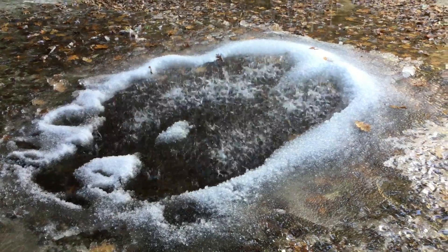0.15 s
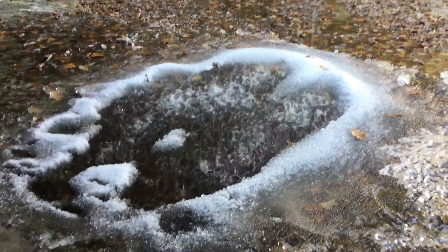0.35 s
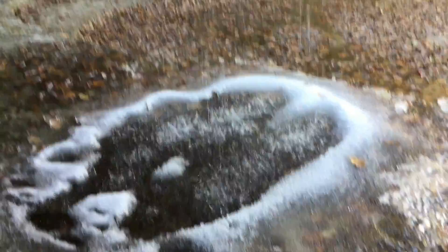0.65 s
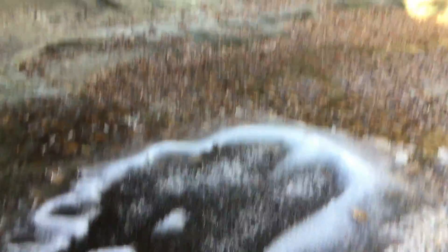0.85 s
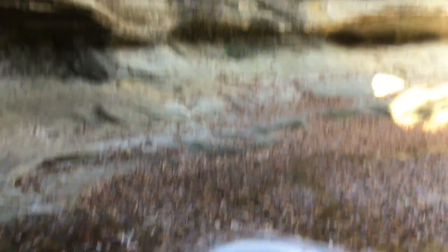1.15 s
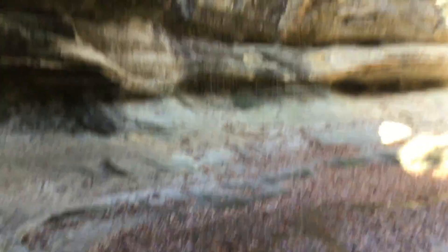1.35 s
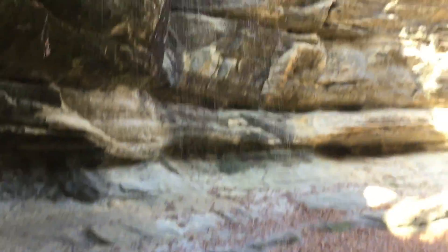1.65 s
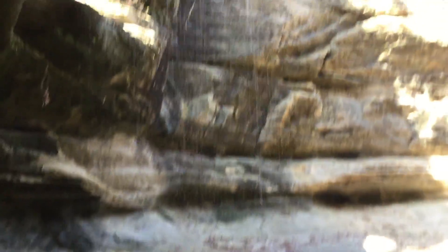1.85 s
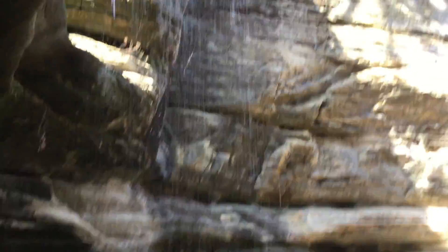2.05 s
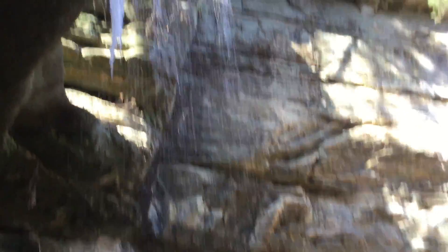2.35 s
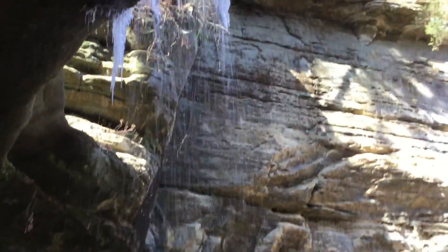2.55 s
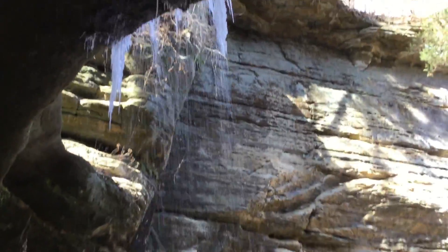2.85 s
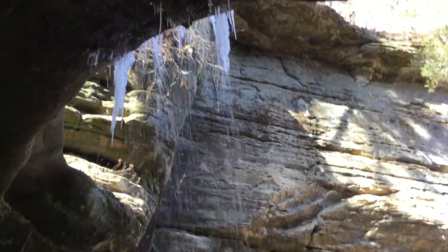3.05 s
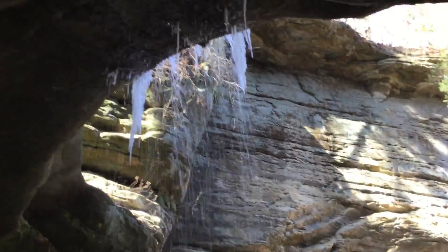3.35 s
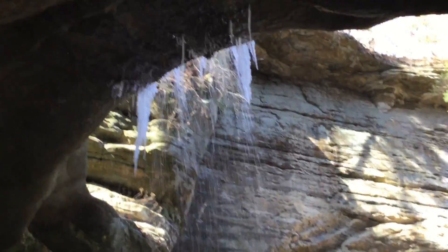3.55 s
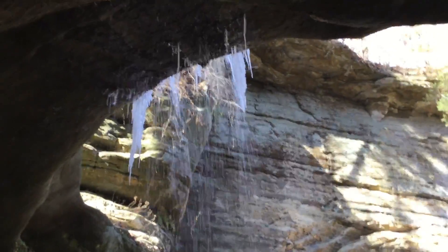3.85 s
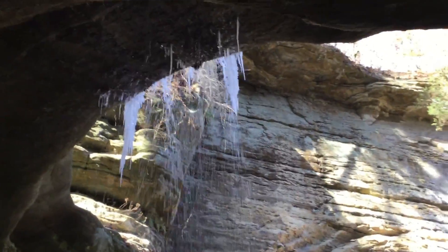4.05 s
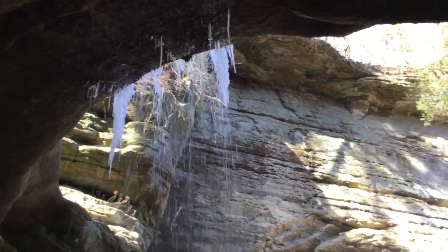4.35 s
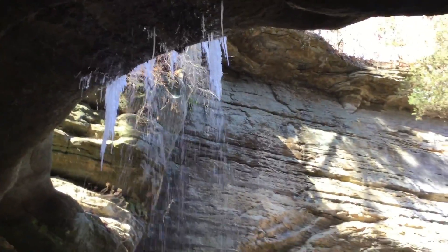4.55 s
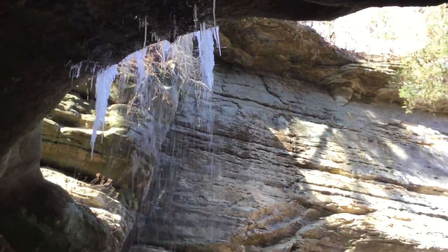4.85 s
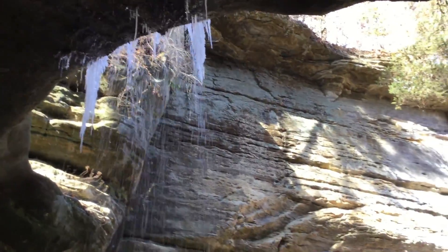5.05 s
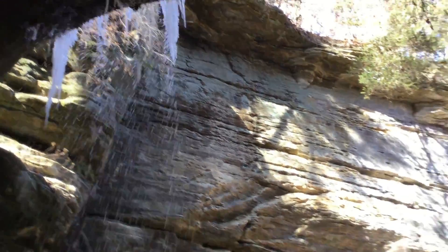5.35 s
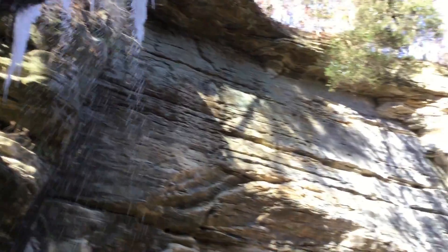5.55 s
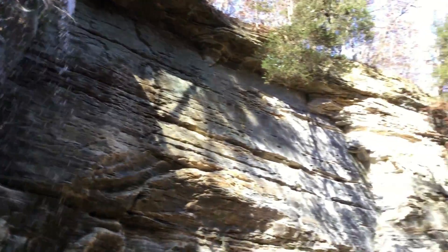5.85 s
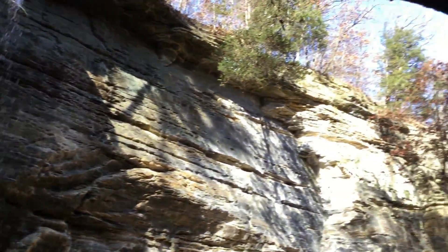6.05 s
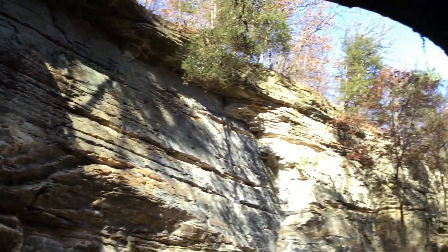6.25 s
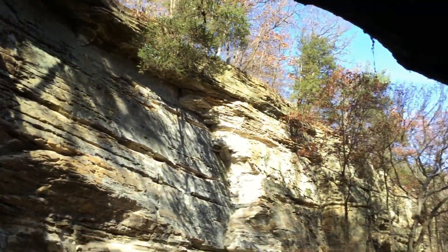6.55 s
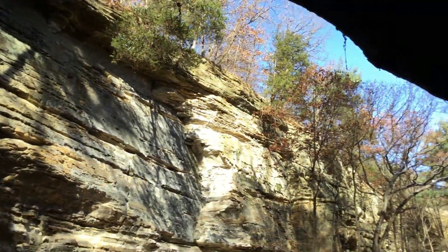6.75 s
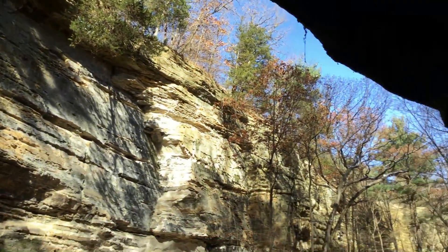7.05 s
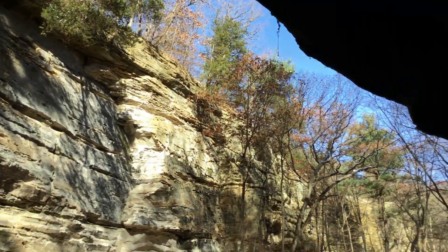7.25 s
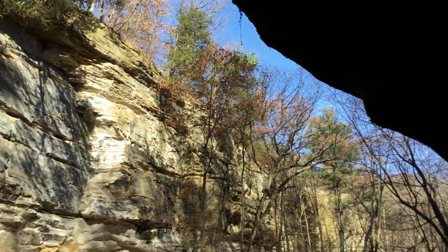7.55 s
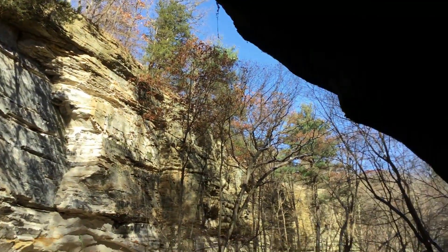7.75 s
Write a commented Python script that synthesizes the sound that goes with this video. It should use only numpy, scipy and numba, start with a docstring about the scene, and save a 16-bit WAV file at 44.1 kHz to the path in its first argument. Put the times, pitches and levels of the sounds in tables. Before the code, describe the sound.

Outdoors under a stone roof, a handheld phone picks up constant dripping and splattering water. Countless fine drops merge into a crisp, fizzing patter, with louder individual drips clicking and ringing irregularly on top, thickest in the first second. Early on the colour shifts as the phone swings upward. Midway a small air bubble gives a quick upward bloop, then the splashing carries on to the end, with little bass.

```python
"""Thin streams of melt water fall from a rock overhang into a shallow pool, a few metres from a phone.
From the start, noise-burst slaps and thousands of damped, ringing bubbles merge into a splashing hiss
with single drops standing out. At about one second the phone tilts up and the balance of the rock
echoes changes; at five seconds an air pocket closes with a rising sine, a bloop. Four scattered
echoes return each drop, and a decaying noise tail adds a short wash throughout."""
import sys
import numpy as np
from scipy import signal
from scipy.fft import rfft, irfft, next_fast_len
from scipy.io import wavfile
from scipy.ndimage import uniform_filter1d
from numba import njit

SR = 44100
rng = np.random.default_rng(int(sys.argv[2]) if len(sys.argv) > 2 else 0)


def master_out(mix):
    """Clip the mix to full scale and print it as 16-bit PCM to the path in sys.argv[1]."""
    frames = np.transpose(np.atleast_2d(mix))
    ceiling = np.clip(frames, -1, 1)
    pcm = np.round(ceiling * 32767).astype(np.int16)
    wavfile.write(sys.argv[1], SR, pcm)


N = 348163

# Echoes off the rock roof and wall. Each row: delay in seconds, level in dB while the phone looks
# down at the pool, level in dB once it looks up at the roof; both levels before random scatter.
ECHOES = [(.0066, -15, -3.5), (.0117, -10, -9.5), (0.0193, -3, -14), (.0257, -43, -14)]
TILT_START_S, TILT_END_S = 0.81, 1.23  # the phone tilts up
ROCK_SCATTER_S = .0004  # drops land at different spots: largest shift of an echo either way
ROCK_SMEAR = 1.3  # rough stone draws the later echoes out by this factor
SMALL_FACE_HZ = 1490  # below this all faces but the broad far wall return less and less
SLAP_S = 0.00053  # time constant of an impact's fading amplitude
PINCH_S = 0.0003  # time a bubble takes to close, besides half its cycle


def undb(db):
    """Amplitude gain: a level in dB is twenty times its decimal logarithm."""
    return 10 ** (np.asarray(db) / 20)


def unit(x):
    """Normalises the mean power: scales to rms 1."""
    return x / np.sqrt(np.mean(x ** 2))


def curve(table, column):
    """Linear interpolation: one column of a table, sample by sample."""
    rows = np.array(table)
    return np.interp(np.arange(N) / SR, rows[:, 0], rows[:, column])


def walk(rate):
    """Low-passed noise: random levels held 1 / rate s and smoothed twice; spread near a half."""
    hold = int(SR / rate)
    steps = np.repeat(rng.standard_normal(N // hold + 1), hold)
    return 0.63 * uniform_filter1d(uniform_filter1d(steps, hold), hold)[:N]


def colour(x, points):
    """Spectral shaping: replaces a sound's smooth spectrum by the (Hz, dB) points, at rms 1."""
    n = next_fast_len(N)
    spectrum = rfft(x, n)
    hz = np.maximum(np.arange(n // 2 + 1) * SR / n, 1)
    centres = 25 * 2 ** (np.arange(31) / 3)  # third octaves
    centres = centres[centres < SR / 2]
    power = [np.mean(np.abs(spectrum[(hz > c * .8) & (hz < c * 1.25)]) ** 2) for c in centres]
    own_db = np.interp(np.log(hz), np.log(centres), 10 * np.log10(power))
    points = np.array(points)
    want_db = np.interp(np.log(hz), np.log(points[:, 0]), points[:, 1])
    return unit(irfft(spectrum * undb(want_db - own_db), n)[:N])


def paths(s, db):
    """Multipath: start samples and levels of each drop, directly, then off the rock roof and wall."""
    chance = rng.random((len(s), 2 * len(ECHOES))) - .5
    times, levels = [s], [db]
    for k, (delay_s, *tilt_db) in enumerate(ECHOES):
        times.append(s + delay_s + 2 * ROCK_SCATTER_S * chance[:, 2 * k])
        echo_db = np.interp(s, [TILT_START_S, TILT_END_S], tilt_db)
        levels.append(db + echo_db + 6 * chance[:, 2 * k + 1])
    return (np.concatenate(times) * SR).astype(np.int64), np.concatenate(levels)


def shower(count, spread_db, surge_db):
    """A random point process, few drops large and many small: time, level and two more chances each."""
    chance = rng.random((count, 4))
    s = chance[:, 0] * N / SR
    db = -spread_db * np.log(1 - .97 * chance[:, 1]) + surge_db[(s * SR).astype(int)]
    return s, db, chance[:, 2], chance[:, 3]


def slaps(s, db):
    """Impact noise: each hit on the surface is a brief burst whose power swells, then fades."""
    start, db = paths(s, db)
    power = np.bincount(start, undb(2 * db), N)[:N] + 1e-18
    keep = np.exp(-2 / (SLAP_S * SR))
    power = signal.lfilter([np.e * (1 - keep)], np.convolve([1, -keep], [1, -keep]), power)
    return np.sqrt(np.abs(power)) * rng.standard_normal(N)


@njit
def ring(n, start, size, turn, cycles, glide, phase, pinch):
    """Damped oscillation: each bubble swells as it pinches off, then fades; its pitch climbs throughout."""
    out = np.zeros(n)
    for g in range(len(start)):
        rise = pinch + .5 / turn[g]
        fade = np.exp(-np.log(1000) * turn[g] / cycles[g])  # 60 dB over the given cycles
        length = int(rise + .7 * cycles[g] / turn[g])
        wave = size[g] * np.exp(1j * phase[g])
        step = np.exp(2j * np.pi * turn[g])
        bend = np.exp(2j * np.pi * turn[g] * glide / length)
        for i in range(min(length, n - start[g])):
            out[start[g] + i] += wave.imag * min(i / rise, 1.)
            wave *= step * (fade if i > rise else 1.)
            step *= bend
    return out


def bubbles(s, db, hz, cycles, glide=0.096):
    """Bubble resonance: ringing drops, whose later echoes spread the same energy over more cycles."""
    start, db = paths(s, db)
    copies = len(ECHOES) + 1
    # long waves bend round the small faces; only the far wall (second echo) returns them
    small_face = np.repeat([0, 1, 0, 1, 1], len(s))
    db = db + small_face * np.tile(10 * np.log2(hz / SMALL_FACE_HZ).clip(None, 0), copies)
    smear = np.repeat([1., 1.] + [ROCK_SMEAR] * (copies - 2), len(s))
    turn = np.minimum(np.tile(hz / SR, copies), .4)  # cycles per sample
    phase = np.tile(2 * np.pi * rng.random(len(s)), copies)
    size = undb(db) / np.sqrt(smear)
    return ring(N, start, size, turn, np.tile(cycles, copies) * smear, 1. * glide, phase, PINCH_S * SR)


def patter(count, lo_hz, hi_hz, cycles, spread_db, surge_db):
    """Superposition: bubbles of countless smaller drops, pitched evenly per octave."""
    s, db, pitch, length = shower(count, spread_db, surge_db)
    return unit(bubbles(s, db, lo_hz * (hi_hz / lo_hz) ** pitch, cycles * 2 ** (2 * length - 1)))


def spray():
    """Modulated noise: droplets too fine to hear alone, as octave bands that flicker on their own."""
    out = 0
    for hz in 60 * 2. ** np.arange(9):
        edges = [hz / np.sqrt(2), min(hz * np.sqrt(2), .45 * SR)]
        band = signal.butter(2, edges, "bp", fs=SR, output="sos")
        out = out + undb(0.6 * walk(14)) * signal.sosfilt(band, rng.standard_normal(N))
    return out


def streams():
    """Incoherent sum: impacts, ticks, plinks, fizz, plops and mist surge as the clumps land."""
    # Splash spectrum. Each row: frequency in Hz, relative power density in dB.
    splash = [(18, -70), (30, -68), (70, -47), (125, -19), (195, -11), (278, -15), (325, -11.5), (469, -12),
              (594, -7), (977, -5.5), (1300, -2), (1880, -3.5), (5360, 2), (7540, -0.5), (14500, -4),
              (15700, -6.5)]
    swell_db = clumps()
    surge_db = 3.2 * swell_db + 1.22 * walk(20)  # most drops surge more than the mist

    s, db, _, _ = shower(count=3600, spread_db=3.0, surge_db=surge_db)
    hits = colour(slaps(s, db), splash)

    ticks = patter(count=9000, lo_hz=1210, hi_hz=9450, cycles=7.2, spread_db=1.5, surge_db=surge_db)
    ticks = signal.sosfilt(signal.butter(2, 8000, fs=SR, output="sos"), colour(ticks, splash))

    plinks = patter(count=4000, lo_hz=1537, hi_hz=6820, cycles=10.0, spread_db=2.0,
                    surge_db=2.4 * surge_db)
    plinks = signal.sosfilt(signal.butter(4, 1000, "hp", fs=SR, output="sos"), plinks)

    fizz = patter(count=20000, lo_hz=591.0, hi_hz=16460, cycles=13.0, spread_db=3.0, surge_db=surge_db)
    fizz = colour(fizz, splash)

    plops = patter(count=300, lo_hz=225.3, hi_hz=1337, cycles=35, spread_db=2.0,
                   surge_db=0.19 * surge_db)
    mist = colour(spray(), splash) * undb(1.3 * swell_db)

    mix = undb(-5.0) * hits + undb(-4.5) * ticks + undb(-8.5) * plinks
    mix = mix + undb(-7.5) * fizz + undb(-28.0) * plops + undb(-8.5) * mist
    return mix * undb(-24)


def drops():
    """Resonance and impact: of the drops that stand out, small ones tick without bass, large ones plop."""
    # Single drops. Each row: start in seconds, level in dB (before the loss of fine drops),
    # initial bubble pitch in Hz.
    loud_drops = [(0.036, -13, 3160), (0.1053, -11, 3570), (0.14, -32, 482), (0.1508, -11, 3930),
                  (0.2029, -14, 1640), (0.2046, -8.5, 3030), (0.2216, -20, 2980), (0.2583, -20, 2350),
                  (0.2756, -11, 4300), (0.325, -20, 1280), (0.341, -7.5, 3850), (0.36, -30, 5280),
                  (0.381, -31, 726), (0.388, -20, 3980), (0.458, -14.5, 2300), (0.485, -12, 5800),
                  (0.5352, -20, 2050), (0.538, -10, 8800), (0.5626, -26, 1700), (0.606, -9, 6360),
                  (0.635, -12, 6000), (0.638, -30, 942), (0.6736, -6, 5600), (0.6902, -18, 3720),
                  (0.7222, -13, 3460), (0.739, -36, 215), (0.767, -19, 2400), (0.874, -28, 717),
                  (0.892, -34, 684), (0.9312, -4, 3860), (0.933, -23, 800), (0.9335, -13, 2250),
                  (0.9328, -15, 1240), (0.942, -21, 1310), (0.951, -20, 1120), (0.962, -13, 2700),
                  (0.9735, -3.5, 4460), (1.016, -12, 5000), (1.096, -33, 617), (1.1258, -14, 2660),
                  (1.148, -18, 5500), (1.1876, -14, 5200), (1.2154, -12, 5030), (1.232, -13, 3220),
                  (1.383, -30, 360), (1.3947, -13, 4800), (1.404, -13, 5630), (1.455, -26, 1630),
                  (1.474, -12, 2100), (1.5454, -18, 2040), (1.713, -16, 2940), (1.7588, -15, 3200),
                  (1.822, -14.5, 1740), (1.861, -10.5, 5940), (1.956, -11, 11900), (2.1, -6, 14100),
                  (2.108, -6.5, 3900), (2.188, -9, 3880), (2.256, -34, 424), (2.263, -12, 3670),
                  (2.3333, -12, 3830), (2.437, -24, 1860), (2.465, -31, 600), (2.533, -13, 6200),
                  (2.802, -11, 6450), (2.843, -33.5, 420), (3.025, -16, 4500), (3.0458, -13, 1940),
                  (3.052, -12, 5700), (3.0747, -12, 3890), (3.0738, -16, 1600), (3.085, -23, 1710),
                  (3.1523, -15, 5770), (3.167, -17, 1960), (3.168, -10, 6000), (3.26, -15, 3360),
                  (3.265, -13, 1900), (3.378, -16, 5000), (3.414, -22, 1550), (3.47, -9, 4430),
                  (3.471, -17, 2320), (3.476, -12, 5800), (3.5598, -13, 3430), (3.554, -34.5, 326),
                  (3.67, -32.5, 347), (3.73, -30.5, 620), (3.838, -28, 820), (3.9097, -19, 1740),
                  (3.948, -32, 590), (4.105, -38, 604), (4.1775, -13, 5300), (4.193, -16, 2100),
                  (4.238, -10.5, 5700), (4.2612, -20, 2320), (4.29, -46, 800), (4.299, -9.5, 4730),
                  (4.344, -16, 2160), (4.345, -9, 3300), (4.44, -7, 14100), (4.5204, -6, 14300),
                  (4.816, -38, 319), (4.8954, -31, 1660), (4.9456, -23, 1610), (4.981, -21, 4830),
                  (5.005, -22, 1580), (5.152, -33.5, 354), (5.168, -14, 4300), (5.225, -21, 1830),
                  (5.247, -15, 6000), (5.294, -11, 5200), (5.333, -19, 3280), (5.353, -6, 5100),
                  (5.3894, -6.5, 3900), (5.4086, -26, 1840), (5.426, -16, 4200), (5.716, -40, 190.6),
                  (5.743, -11, 4460), (5.855, -15, 2990), (5.8863, -9, 1629), (5.9077, -15, 1700),
                  (5.9644, -7, 8600), (5.997, -33, 432), (6.0074, -6, 14280), (6.1438, -22, 1700),
                  (6.157, -15, 2396), (6.18, -15, 2660), (6.2382, -21, 2130), (6.248, -32, 770),
                  (6.353, -23, 3700), (6.514, -33, 590), (6.5388, -12.5, 1950), (6.567, -36, 190.5),
                  (6.746, -32.5, 390), (6.767, -12, 4270), (6.873, -11, 2720), (6.9715, -23, 1850),
                  (6.9905, -7, 5640), (7.0364, -22, 1960), (7.047, -12, 4460), (7.0833, -6, 4560),
                  (7.1238, -14, 2360), (7.2303, -9, 5170), (7.3664, -10, 2295), (7.423, -37, 180),
                  (7.65, -10, 2250), (7.655, -25, 867), (7.744, -32, 620), (7.792, -14, 2610),
                  (7.8175, -9, 3925), (7.827, -13, 4820), (7.836, -12, 4500), (7.881, -24, 5540)]
    hard_cycles, cycles_per_db = 3.7, 0.9  # cycles to fade 60 dB at 0 dB; gentler drops ring longer
    longest_ring_s = 0.076  # large bubbles burst at the surface before they ring out
    fine_hz = 8000  # drops pitched above this count as fine
    slap_db, fine_slap_db = -6, -8.5  # impact level relative to the listed drop level
    mic_low_hz = 181

    s, db, hz = np.transpose(loud_drops)
    cycles = (hard_cycles - cycles_per_db * db).clip(2.5, longest_ring_s * hz)
    small = hz > 800
    fine = hz > fine_hz
    medium = small & ~fine

    # the finest drops hold little air: less ring, and a thin bright slap
    fine_loss_db = 6 * np.log2(hz[small] / fine_hz).clip(0)
    ticks = bubbles(s[small], db[small] - fine_loss_db, hz[small], cycles[small])
    dull = signal.butter(1, 7000, fs=SR, output="sos")
    ticks = ticks + signal.sosfilt(dull, slaps(s[medium], db[medium] + slap_db))
    bright = signal.butter(2, 4000, "hp", fs=SR, output="sos")
    ticks = ticks + signal.sosfilt(bright, slaps(s[fine], db[fine] + fine_slap_db))
    ticks = signal.sosfilt(signal.butter(2, 750, "hp", fs=SR, output="sos"), ticks)

    plops = bubbles(s[~small], db[~small], hz[~small], cycles[~small], glide=0.056)
    # the small microphone takes up little of their thump
    return signal.sosfilt(signal.butter(4, mic_low_hz, "hp", fs=SR, output="sos"), ticks + plops)


def clumps():
    """Flow break-up: the streams break into clumps that land together, each a Gaussian swell in dB."""
    # Largest clumps. Each row: centre in seconds, swell in dB before each layer scales it.
    landings = [(0.16, 1), (0.685, 0.5), (1.779, 0.5), (3.035, 0.5), (3.09, 1), (3.277, 0.5), (4.986, 1),
                (5.75, 0.8), (6.01, 0.44), (6.922, 1.1), (7.085, 0.5), (7.178, 1), (7.677, 1)]
    width_s = 0.0083  # standard deviation of a swell
    t = np.arange(N) / SR
    out = np.zeros(N)
    for s, db in landings:
        near = slice(max(int((s - .1) * SR), 0), int((s + .1) * SR))
        out[near] += db * np.exp(-.5 * ((t[near] - s) / width_s) ** 2)
    return out


def bloop():
    """Cavity resonance: a wavering sine climbs and grows as a large air pocket shrinks, then stops."""
    start_s, climb_s, ramp_s = 5.034, .088, .022  # the ramp fades the sine in and out
    low_hz, high_hz = 230, 1620
    start_db, peak_db = -43, -25  # before the wavering
    t = np.arange(N) / SR - start_s
    shrunk = (t / climb_s).clip(0, 1)
    hz = low_hz * (high_hz / low_hz) ** shrunk
    db = start_db + (peak_db - start_db) * shrunk ** 5 + 4 * walk(120)
    gate = (t / ramp_s).clip(0, 1) * (1 - (t - climb_s) / ramp_s).clip(0, 1)
    return gate * undb(db) * np.sin(2 * np.pi * np.cumsum(hz) / SR)


def wash(water):
    """Reverberation: convolution with exponentially decaying noise, the wash under the overhang."""
    t60_s = 0.44  # time to decay by 60 dB
    t = np.arange(int(t60_s * SR)) / SR
    tail = rng.standard_normal(len(t)) * undb(-60 * t / t60_s) * np.minimum(t / 0.0011, 1)
    return undb(-11.5) * signal.fftconvolve(water, tail / np.sqrt(np.sum(tail ** 2)))[:N]


def scene():
    """Linear superposition: the water, and its wash under the overhang."""
    water = streams() + drops() + bloop()
    return (water + wash(water))[None]


def record(dry):
    """Directivity and saturation: aim shades the treble, loud peaks are rounded and the top is cut."""
    # The phone swings about and its body shades the treble. Each row: time in seconds, treble gain in dB.
    aim = [(0.0, 3), (0.57, 3.5), (1.26, -2.5), (2.59, 2.5), (4.77, 2.5), (7.46, 1), (7.9, -0.5)]
    top_hz = 15750
    treble = signal.sosfilt(signal.butter(2, 9000, "hp", fs=SR, output="sos"), dry)
    aimed = dry + (undb(curve(aim, 1)) - 1) * treble
    rounded = np.tanh(.6 * aimed) / .58
    return signal.sosfilt(signal.ellip(10, .2, 75, top_hz, fs=SR, output="sos"), rounded)


dry = scene()
out = record(dry)
master_out(out)
```